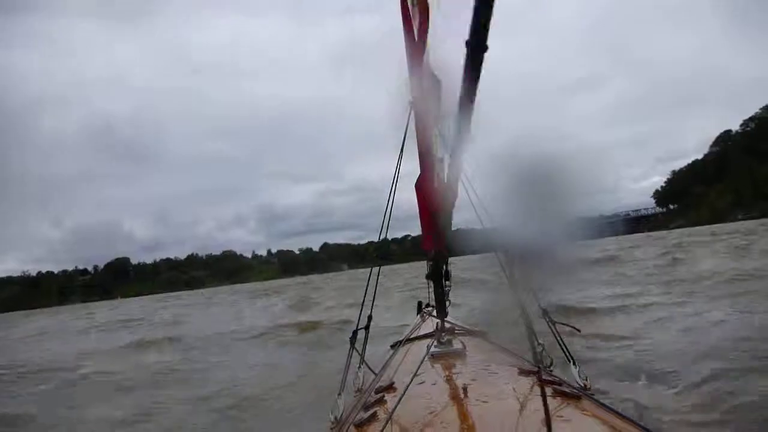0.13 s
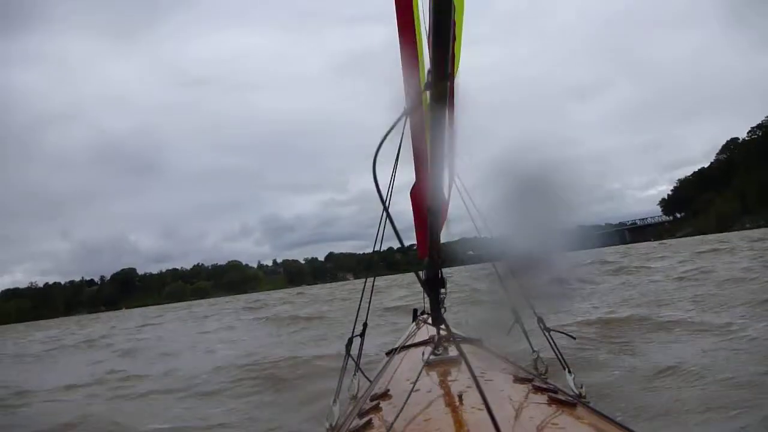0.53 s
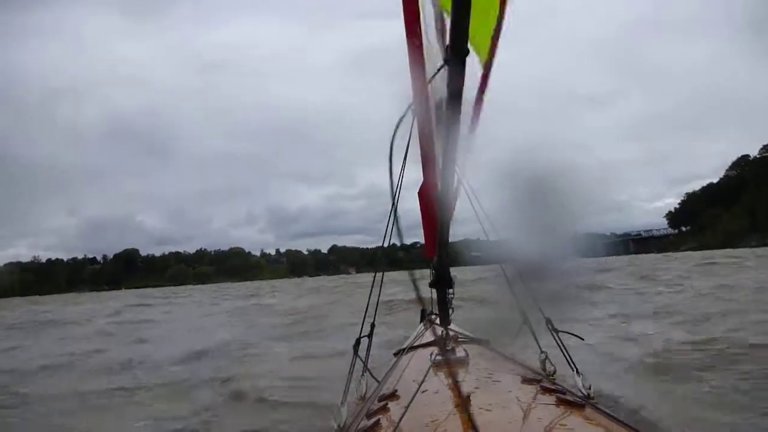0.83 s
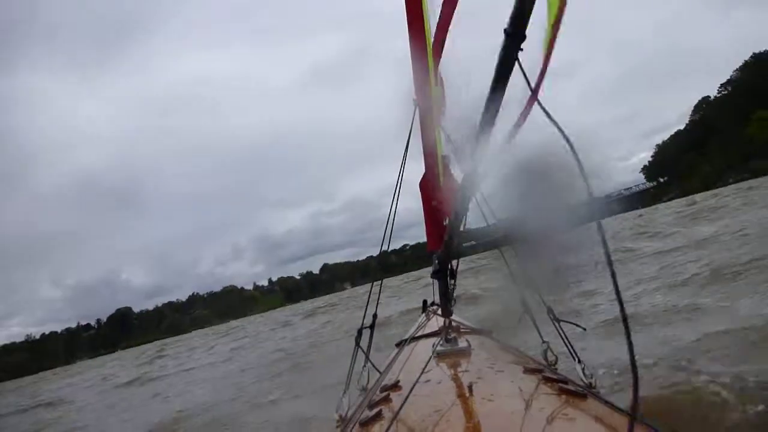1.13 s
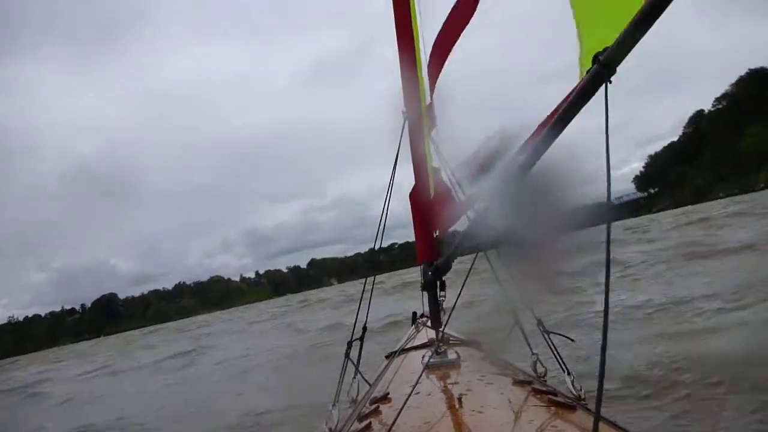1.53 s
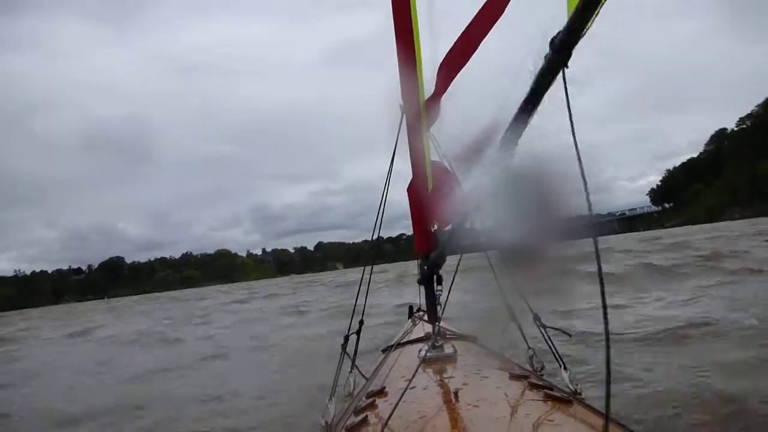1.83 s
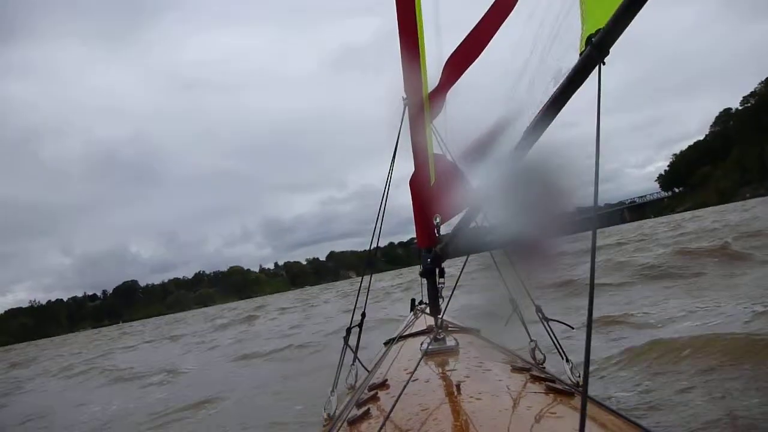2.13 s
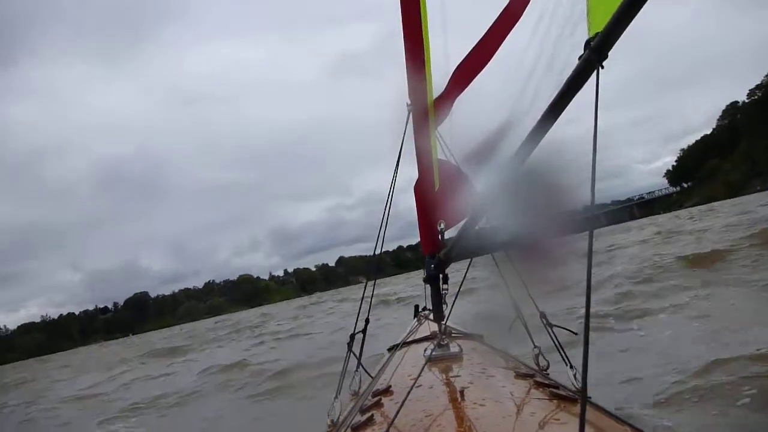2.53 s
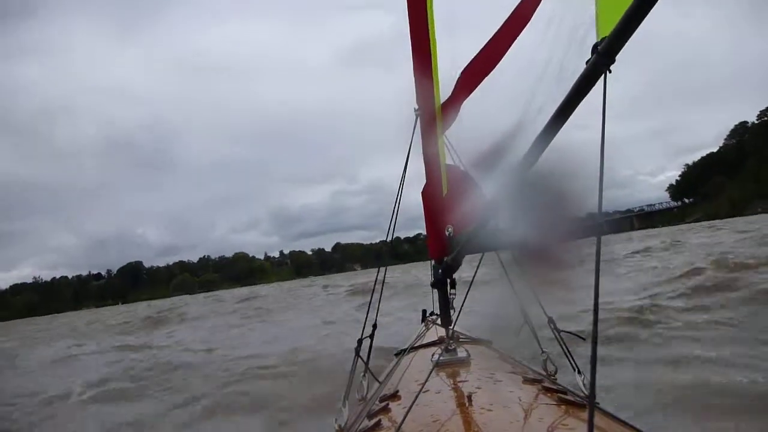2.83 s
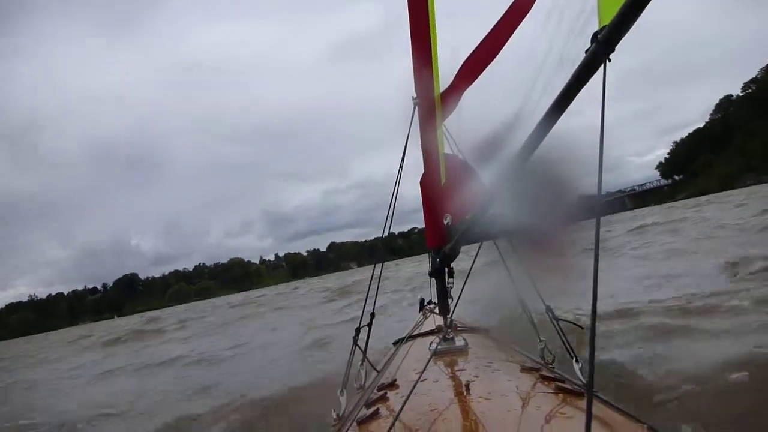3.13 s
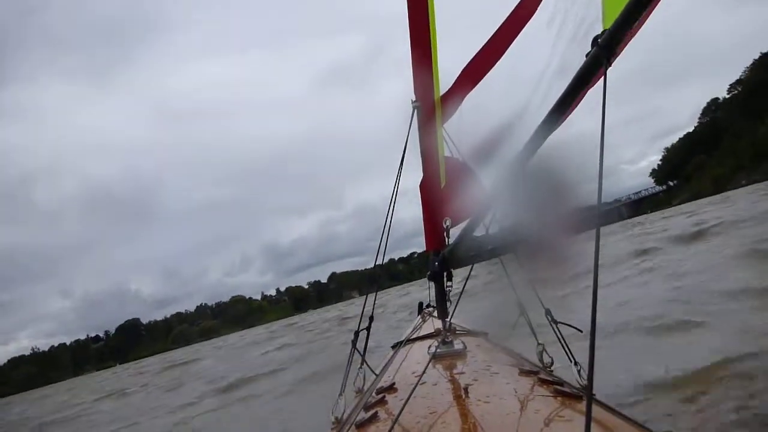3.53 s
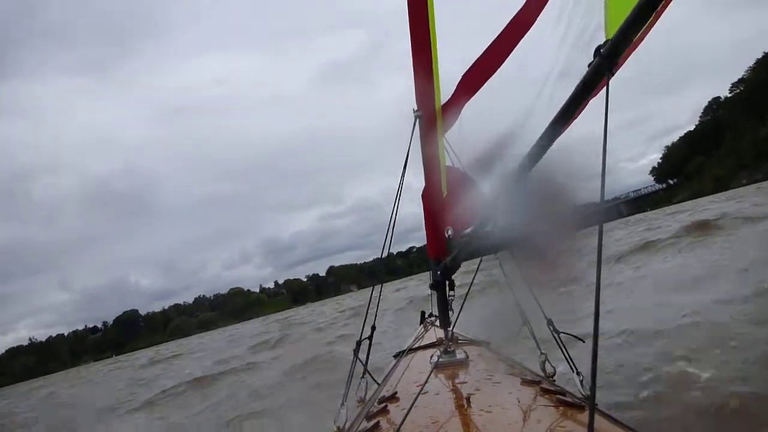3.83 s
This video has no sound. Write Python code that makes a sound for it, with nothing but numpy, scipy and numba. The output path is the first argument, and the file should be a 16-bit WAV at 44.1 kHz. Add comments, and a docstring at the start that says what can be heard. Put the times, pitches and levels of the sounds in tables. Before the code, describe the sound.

A sail flaps in irregular, dull airy thuds from about 0.06 to 1.7 s, over bubbling bow spray; the strongest splash and deck smacks come near 0.7 s. Then the flapping stops, leaving fainter hull wash. Wind blasts strike around 2.0-2.25 s, ease with small bumps, then build to rough, brighter buffeting at 3.15-3.65 s, easing towards 4 s. Low rumble underneath; close, muffled onboard microphone outdoors.

```python
"""On a choppy river in a strong wind, a small sailing boat turns, heard by the microphone of a camera on board.
The bow throws spray (ringing bubbles, spatter and patchy foam) and heavier drops smack on the deck.
The luffing sail flaps and sends puffs of turbulent air at the microphone until it fills.
Then water rushes along the hull, and gusts and single hard eddies of filtered noise buffet the microphone
in its splashproof case."""
import sys
import numpy as np
from scipy import signal
from scipy.fft import rfft, irfft
from scipy.io import wavfile
from scipy.ndimage import uniform_filter1d
from numba import njit

SR = 44100
rng = np.random.default_rng(int(sys.argv[2]) if len(sys.argv) > 2 else 0)


def unload_audio(sound):
    """Save the sound as a 16-bit wav file, at the path given as the first command line argument."""
    columns = np.transpose(np.atleast_2d(sound))
    # keep every value between -1 and 1, then stretch to whole-number steps
    steps = np.round(np.clip(columns, -1, 1) * 32767)
    wavfile.write(sys.argv[1], SR, steps.astype(np.int16))


N = 176400   # samples, four seconds


def from_db(db):
    """Decibels to amplitude gain."""
    return 10 ** (np.asarray(db) / 20)


def rms_one(x):
    """Scale to an rms of 1."""
    return x / np.sqrt(np.mean(x ** 2) + 1e-20)


def in_time(rows):
    """Draw straight lines between the rows: each column at every sample."""
    s, *columns = np.transpose(rows)
    return [np.interp(np.arange(N) / SR, s, column) for column in columns]


def coloured(x, points):
    """Give a steady sound a spectrum, joined over log frequency; rms 1."""
    hz, db = np.transpose(points)
    bins_hz = np.maximum(np.arange(N // 2 + 1) * SR / N, 1)
    gain = from_db(np.interp(np.log(bins_hz), np.log(hz), db))
    return rms_one(irfft(rfft(x) * gain, N))


def butter(x, hz, kind, order):
    """Butterworth filter."""
    return signal.sosfilt(signal.butter(order, hz, kind, fs=SR, output="sos"), x)


def drift(rate_hz):
    """Smooth random wander with a spread of 1: noise through two equal low-pass poles."""
    r = np.exp(-2 * np.pi * rate_hz / SR)
    noise = rng.standard_normal(N + SR)
    settled = signal.lfilter([1], [1, -2 * r, r * r], noise)[SR:]
    return rms_one(settled)


def evened(x, size):
    """Hold the short-term rms at 1; size is in samples."""
    power = uniform_filter1d(uniform_filter1d(x * x, size), size)
    return x / np.sqrt(np.abs(power) + 1e-20)


def grains(per_s, spread_db):
    """Clicks of either sign at random moments: many small ones, a few large."""
    sizes = from_db(spread_db * np.minimum(rng.exponential(1, N), 4)) * rng.choice([-1, 1], N)
    return sizes * (rng.random(N) < per_s / SR)


BUBBLES_PER_S, BUBBLE_SPREAD_DB = 1400, 2.5
BUBBLE_CYCLES = 12   # cycles in which a bubble's ring falls by 60 dB


def bubbles(count):
    """Bubbles of random size: each click rings one of `count` resonators, smaller bubbles ringing higher."""
    clicks = grains(BUBBLES_PER_S, BUBBLE_SPREAD_DB)
    dealt = rng.integers(0, count, N)   # which resonator a click rings
    out = 0
    for k, hz in enumerate(np.geomspace(400, 7000, count)):
        r = np.exp(-np.log(1000) * hz / (BUBBLE_CYCLES * SR))
        w = 2 * np.pi * hz / SR
        struck = clicks * (dealt == k) + 1e-18
        out = out + hz * signal.lfilter([1, 0, -1], [1, -2 * r * np.cos(w), r * r], struck)
    return rms_one(out)


WATER_PATCHY_DB, WATER_FLUTTER_DB = 2.34, 1.1   # spread of each foam band, and of the whole
BUBBLES_DB, SPATTER_DB = -4.5, -9.5   # against the foam
SPATTER_PER_S, SPATTER_SPREAD_DB = 220, 4.5


def water(colour):
    """Broken water: bubbles and spattering droplets in a hiss of foam whose bands wander separately."""
    edges = np.geomspace(60, 9000, 15)
    white = rng.standard_normal((2, N))   # neighbouring bands take different noise
    foam = 0
    for k, (low, high) in enumerate(zip(edges, edges[1:])):
        band = butter(white[k % 2], [low, high], "band", order=2)
        foam = foam + band * from_db(WATER_PATCHY_DB * drift(25))
    spatter = rms_one(butter(grains(SPATTER_PER_S, SPATTER_SPREAD_DB), [1200, 8000], "band", order=1))
    mix = rms_one(foam) + from_db(BUBBLES_DB) * bubbles(count=32) + from_db(SPATTER_DB) * spatter
    return coloured(mix, colour) * from_db(WATER_FLUTTER_DB * drift(42))


# Spray at the bow in the turn. Each row: time in seconds, level in dB before SPRAY_GAIN_DB.
SPRAY_LEVEL = [(0.04, -57), (0.048, -51.5), (0.066, -60), (0.106, -43), (0.138, -54), (0.246, -37.5),
               (0.46, -38.5), (0.482, -31.5), (0.518, -44), (0.524, -54), (0.55, -47.5), (0.56, -63),
               (0.59, -43.5), (0.604, -55), (0.712, -32), (0.72, -37), (0.734, -24), (0.756, -34),
               (0.824, -48.5), (0.932, -43.5), (0.962, -49.5), (1.092, -43), (1.116, -53.5), (1.124, -60),
               (1.164, -44.5), (1.188, -55.5), (1.206, -45.5), (1.236, -56), (1.264, -50.5), (1.304, -52),
               (1.318, -42), (1.336, -54.5), (1.354, -42.5), (1.412, -56), (1.43, -44), (1.55, -46.5),
               (1.586, -56.5), (1.614, -51), (1.618, -59), (1.65, -69)]
# Wash along the hull, under way. Each row: time in seconds, level in dB before WASH_GAIN_DB.
WASH_LEVEL = [(1.65, -62), (1.722, -57), (1.73, -57.5), (1.794, -50.5), (2.09, -58), (2.15, -56),
              (2.214, -59.5), (2.28, -48.5), (2.324, -59), (2.356, -51), (2.848, -54.5), (2.966, -60.5),
              (3.026, -59), (3.1, -62)]
# The same wash further on. Each row: time in seconds, level in dB before WASH_GAIN_DB.
WASH_LEVEL_LATE = [(3.202, -64.5), (3.6, -66.5), (4, -59.5)]
# Spectrum of the spray. Each row: frequency in Hz, relative density in dB per Hz.
SPRAY_SPECTRUM = [(60, -10.5), (200, -10), (450, 1), (650, -5.5), (1000, 1), (1350, 1), (1750, -7),
                  (2200, -2), (3200, -12.5), (4800, -24), (6400, -33.5), (7500, -51.5)]
# Spectrum of the wash. Each row: frequency in Hz, relative density in dB per Hz.
WASH_SPECTRUM = [(60, -11.5), (200, 2), (450, 0), (700, 1.5), (1250, -0.5), (1750, -4.5), (2300, -6),
                 (3200, -12.5), (4800, -20.5), (6400, -29.5), (7500, -50)]
SPRAY_GAIN_DB, WASH_GAIN_DB = 8, 12.5


def river():
    """Spray at the bow during the turn gives way to the wash along the hull in an equal-power crossfade."""
    spray_db, = in_time(SPRAY_LEVEL)
    wash_db, = in_time([*WASH_LEVEL, *WASH_LEVEL_LATE])
    turn_ends_s = SPRAY_LEVEL[-1][0]
    under_way = np.clip((np.arange(N) / SR - turn_ends_s) * 20 + .5, 0, 1)   # over 50 ms
    spray = from_db(spray_db + SPRAY_GAIN_DB) * water(SPRAY_SPECTRUM)
    wash = from_db(wash_db + WASH_GAIN_DB) * water(WASH_SPECTRUM)
    return np.sqrt(1 - under_way) * spray + np.sqrt(under_way) * wash


# Heavier drops of spray on the deck. Each row: start in seconds, level in dB at the onset.
DECK_DROPS = [(0.469, -26.5), (0.478, -29.5), (0.652, -29.5), (0.683, -24), (.710, -27), (0.724, -18),
              (0.735, -26.5), (0.842, -39.5), (1.318, -36.5), (1.539, -36.5), (1.610, -46), (3.795, -41)]
# Spectrum of a smack. Each row: frequency in Hz, relative density in dB per Hz.
DROP_SPECTRUM = [(200, -20.5), (900, 2), (2200, 3), (3500, -4.5), (5500, -6.5), (7500, -48)]
DROP_DECAY_S = 0.0034   # time constant


def drops():
    """Each drop smacks on the deck: a burst of coloured noise with an instant onset and exponential decay."""
    t = np.arange(N) / SR
    smacks = 0
    for s, db in DECK_DROPS:
        decay = np.exp(-np.minimum(np.abs(t - s) / DROP_DECAY_S, 20))
        smacks = smacks + from_db(db) * (t >= s) * decay
    return smacks * coloured(rng.standard_normal(N), DROP_SPECTRUM)


@njit
def moving_lowpass(x, step, damping):
    """Two-pole low-pass whose corner (radians per sample) moves."""
    out, low, band = np.zeros(len(x)), 0., 0.
    for i in range(len(x)):
        band += step[i] * (x[i] - low - damping * band)
        low += step[i] * band
        out[i] = low
    return out


TURBULENCE_DB, TURBULENCE_PER_S = 1.5, 158   # spread of the lumps, and their rate in Hz
EDDY_OCTAVES = 0.18   # a stronger lump is brighter
AIR_DAMPING, CRACKLE_DB = 1.264, -36   # filter damping; share of sharp crackle
PORT_HZ = 4200   # the covered microphone port dulls the buffeting


def turbulence(corner_hz, cut_hz, steep_hz):
    """Lumpy air pressure: faster air has smaller eddies and so a higher corner; the camera cuts the bass."""
    lumps = drift(TURBULENCE_PER_S)
    air = rng.standard_normal(N) * from_db(TURBULENCE_DB * lumps)
    air = butter(air, PORT_HZ, "low", order=3)
    air = butter(air, cut_hz, "high", order=1)
    air = butter(air, steep_hz, "high", order=2)
    moving_hz = np.clip(corner_hz * 2 ** (EDDY_OCTAVES * (lumps - 1)), 100, 3000)
    step = 2 * np.pi * moving_hz / SR
    sharp = moving_lowpass(air, step, AIR_DAMPING)
    soft = moving_lowpass(sharp, step, AIR_DAMPING)
    return evened(soft - from_db(CRACKLE_DB) * sharp, size=650)


EDDY_RISE_S, EDDY_FALL_S = 0.0019, 0.0026   # time constants


def puffs(rows, cut_hz, steep_hz):
    """Short blasts of air: quick rise, hold, quick fall; overlapping blasts add in power."""
    t = np.arange(N) / SR
    power, weighted_hz = 0, 0
    for s, length, db, hz in rows:
        fade = np.maximum(s - t, 0) / EDDY_RISE_S + np.maximum(t - s - length, 0) / EDDY_FALL_S
        blast = (from_db(db) * np.exp(-np.minimum(fade, 20))) ** 2
        power = power + blast
        weighted_hz = weighted_hz + blast * hz
    return np.sqrt(power) * turbulence(weighted_hz / power, cut_hz, steep_hz)


# Wind on the microphone. Each row: time in seconds, level in dB, brightness as nominal corner in Hz.
WIND_COURSE = [(0, -51, 244), (.5, -38.5, 295), (.95, -41, 302), (1.3, -44.5, 277), (1.88, -43.5, 278),
               (2.0, -30.5, 394), (2.095, -30, 406), (2.115, -23.5, 605), (2.19, -23.5, 670),
               (2.25, -29.5, 603), (2.29, -40.5, 302), (2.45, -38.5, 310), (2.55, -35.5, 378),
               (2.65, -42, 300), (2.76, -32.5, 350), (2.82, -38.5, 281), (2.89, -31.5, 314),
               (2.98, -31.5, 370), (3.04, -24, 527), (3.07, -40.5, 302), (3.12, -36.5, 280),
               (3.18, -22.5, 550), (3.26, -23.5, 650), (3.30, -20, 1020), (3.40, -25, 898),
               (3.45, -19.5, 1134), (3.51, -20.5, 918), (3.57, -20.5, 1093), (3.625, -20, 930),
               (3.64, -29, 483), (3.77, -28, 610), (3.93, -34.5, 378), (4, -32.5, 415)]
# Spectrum of the low rumble. Each row: frequency in Hz, relative density in dB per Hz.
RUMBLE_SPECTRUM = [(20, -25), (40, -16), (60, -5), (110, 10), (170, 1.5), (300, -13), (900, -57.5)]
WIND_CUT_HZ, WIND_CUT_STEEP_HZ = 540, 160
WIND_USUAL_DB, RUMBLE_DB = -33, -50.5   # the rumble's level when the wind is at its usual level
RUMBLE_FOLLOWS = 0.28   # share of the wind's swing in dB


def wind():
    """Gusts swell and brighten over a low rumble that follows them loosely."""
    db, corner_hz = in_time(WIND_COURSE)
    rumble_db = RUMBLE_DB + RUMBLE_FOLLOWS * (db - WIND_USUAL_DB)
    rumble = from_db(rumble_db) * coloured(rng.standard_normal(N), RUMBLE_SPECTRUM)
    return from_db(db) * turbulence(corner_hz, WIND_CUT_HZ, WIND_CUT_STEEP_HZ) + rumble


# Single hard eddies within the gusts at the microphone.
# Each row: start in seconds, hold in seconds, level in dB, brightness as nominal corner in Hz.
HARD_EDDIES = [(2.017, 0.0047, -39, 700), (2.024, .010, -21.5, 850), (2.055, 0.0035, -21, 650),
               (2.068, 0.0032, -21.5, 530), (2.145, 0.0073, -17.5, 850), (2.184, 0.012, -17.5, 875),
               (2.213, 0.0025, -19, 750), (2.545, 0.0079, -28.5, 453), (2.574, 0.007, -29, 452),
               (2.594, 0.0091, -31.5, 920), (2.690, 0.034, -30, 352), (2.999, 0.0082, -29.5, 450),
               (3.165, 0.005, -21, 496), (3.195, .021, -21.5, 746), (3.264, 0.0022, -17.5, 750),
               (3.287, 0.0034, -27.5, 1230), (3.321, 0.0057, -21, 1090), (3.341, 0.0021, -17.5, 900),
               (3.379, 0.0042, -23.5, 1270), (3.448, 0.01, -21.5, 1350), (3.563, 0.016, -22, 1106),
               (3.609, 0.017, -16.5, 830), (3.685, 0.027, -24, 830), (3.736, 0.02, -19.5, 810),
               (3.820, 0.016, -28, 550), (3.862, 0.0099, -30, 500), (3.899, 0.0057, -22, 444)]


def eddies():
    """Hard eddies strike the microphone as short blasts, with the bass cut of the wind."""
    return puffs(HARD_EDDIES, WIND_CUT_HZ, WIND_CUT_STEEP_HZ)


# Puffs from the flapping sail at the microphone.
# Each row: start in seconds, hold in seconds, level in dB, brightness as nominal corner in Hz.
SAIL_FLAPS = [(.060, 0.0051, -34.5, 350), (.218, 0.0082, -28.5, 577), (.250, 0.0058, -27.5, 504),
              (.515, 0.0053, -24, 600), (.529, 0.035, -26, 590), (.594, 0.015, -29.5, 660),
              (.612, 0.009, -27.5, 450), (.765, 0.021, -26.5, 770), (.795, 0.022, -27, 536),
              (.884, 0.015, -30.5, 500), (.962, .005, -26.5, 470), (1.087, 0.014, -21.5, 860),
              (1.100, 0.023, -28, 860), (1.130, .008, -29, 500), (1.194, 0.0081, -31, 800),
              (1.202, 0.013, -23, 1080), (1.546, 0.0075, -31, 500), (1.600, 0.013, -25.5, 740),
              (1.692, 0.0053, -30.5, 402)]
FLAP_CUT_HZ, FLAP_CUT_STEEP_HZ = 244, 75


def sail():
    """The luffing sail moves a broad mass of air, so its puffs reach deeper than the wind's eddies."""
    return puffs(SAIL_FLAPS, FLAP_CUT_HZ, FLAP_CUT_STEEP_HZ)


def scene():
    """Water, wind and sail at one microphone."""
    return (river() + drops() + wind() + eddies() + sail())[None]


START_S = .034   # silence before the sound opens
BASS_CUT_HZ, CUTOFF_HZ = 47, 7300
NOTCH_HZ, NOTCH_Q = 2890, 8.4


def record(dry):
    """The camera starts, cuts the deep bass, carves a narrow notch in the treble and cuts the top."""
    started = np.clip((np.arange(N) / SR - START_S) * 300, 0, 1)
    lean = butter(dry * started, BASS_CUT_HZ, "high", order=3)
    notched = signal.lfilter(*signal.iirnotch(NOTCH_HZ, NOTCH_Q, fs=SR), lean)
    return signal.sosfilt(signal.ellip(8, .3, 70, CUTOFF_HZ, fs=SR, output="sos"), notched)


dry = scene()
out = record(dry)
unload_audio(out)
```